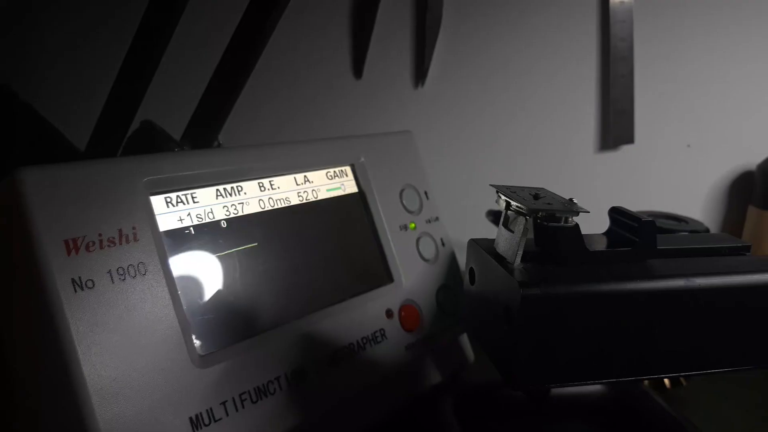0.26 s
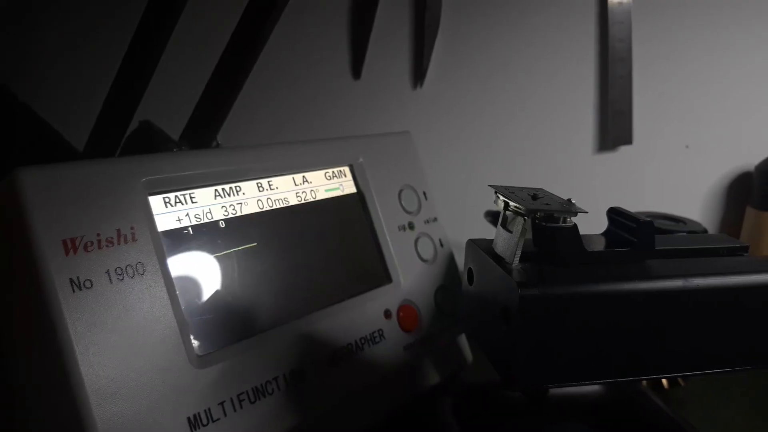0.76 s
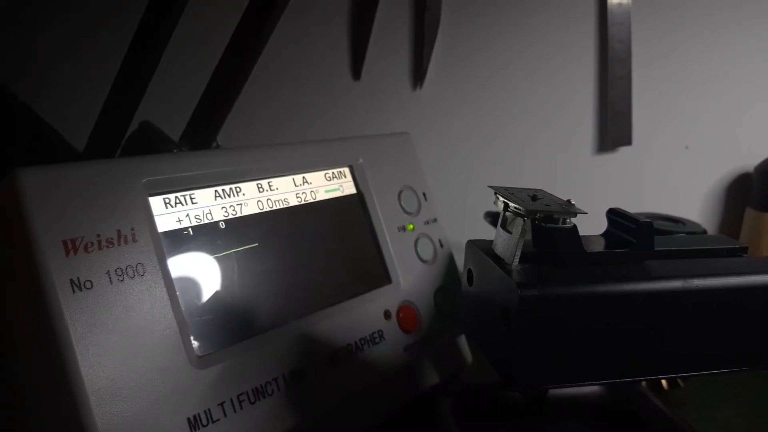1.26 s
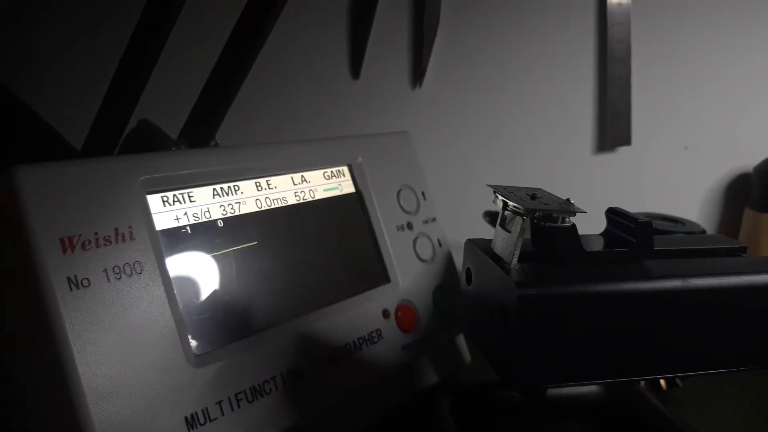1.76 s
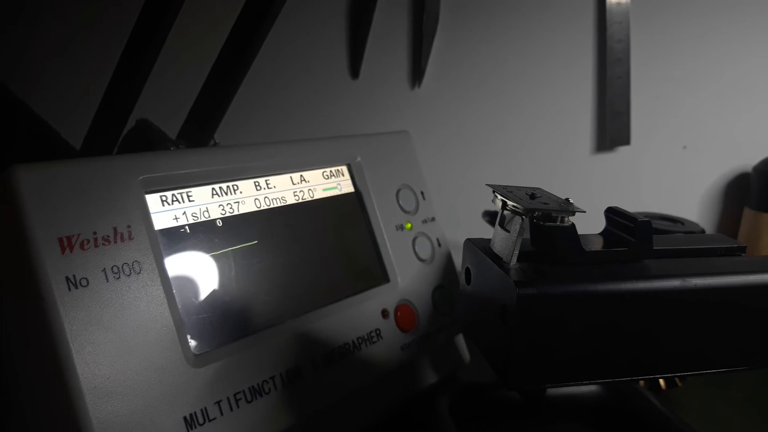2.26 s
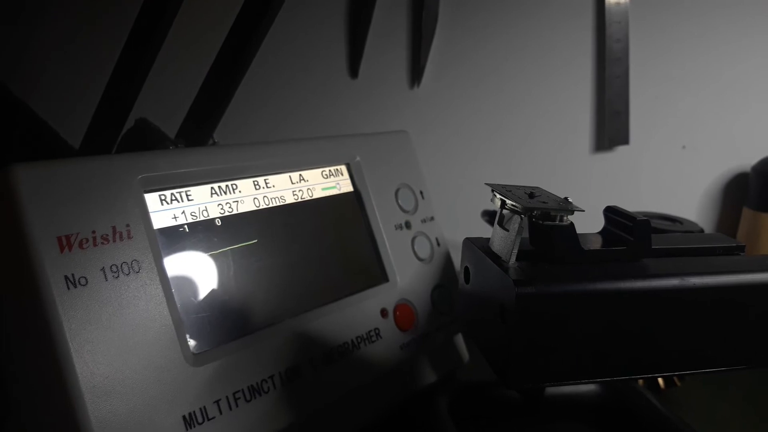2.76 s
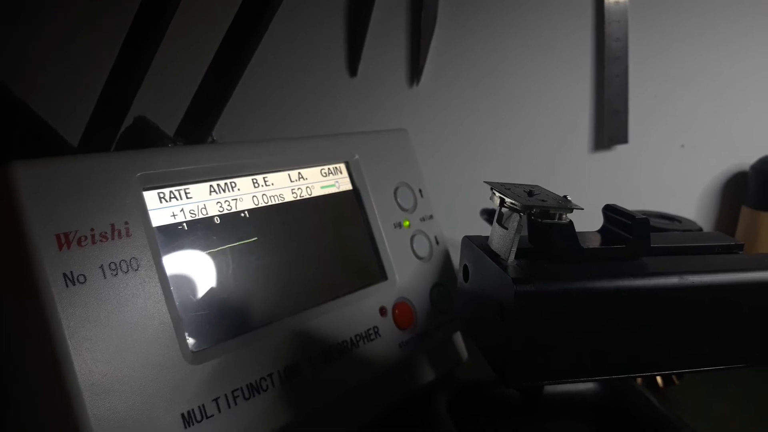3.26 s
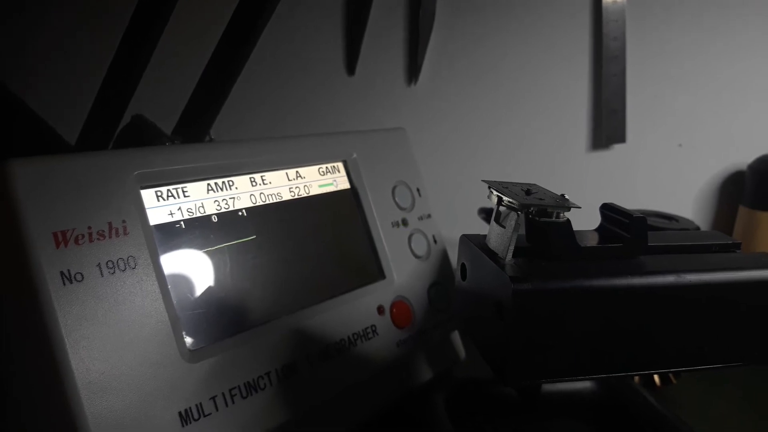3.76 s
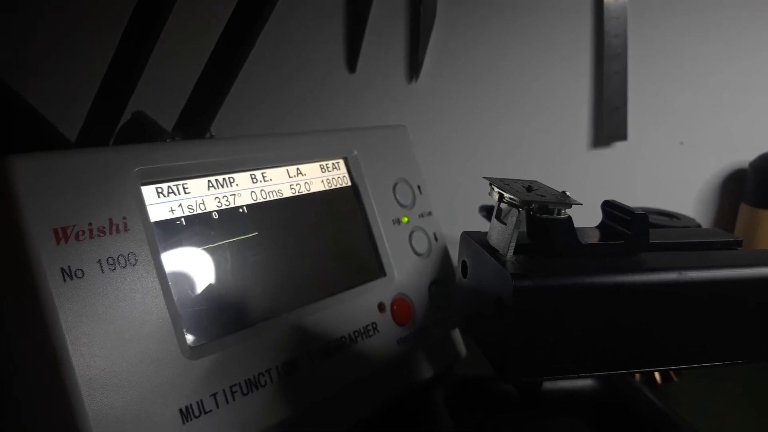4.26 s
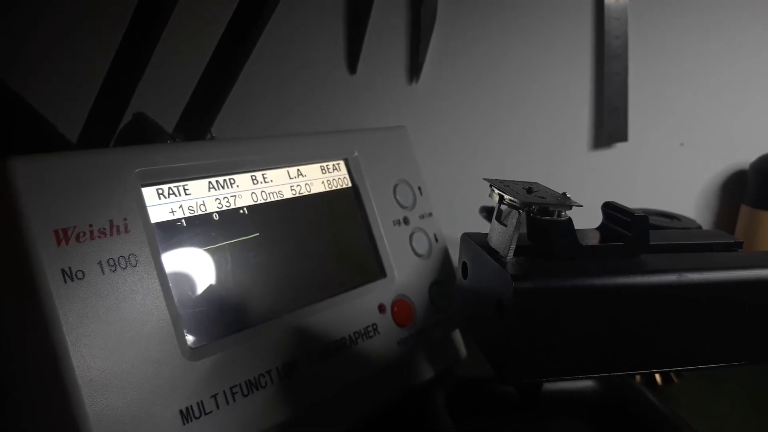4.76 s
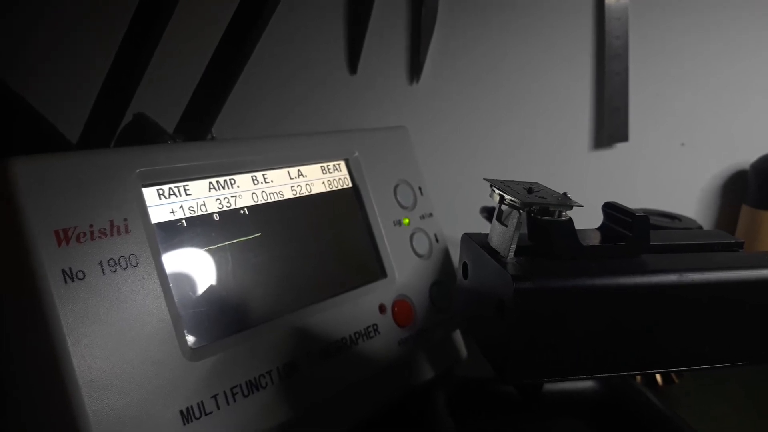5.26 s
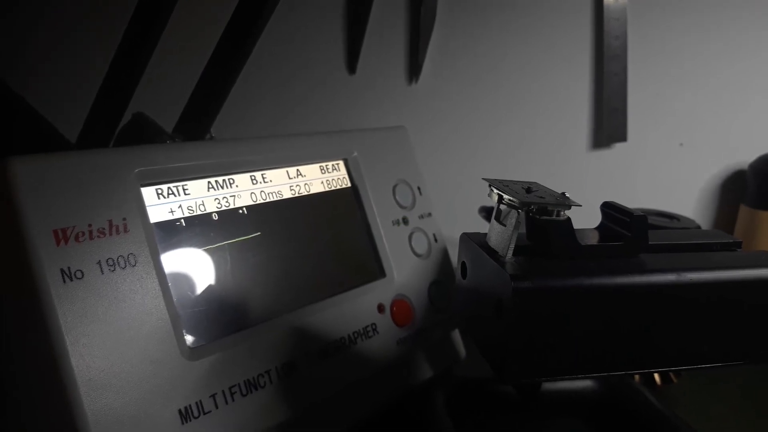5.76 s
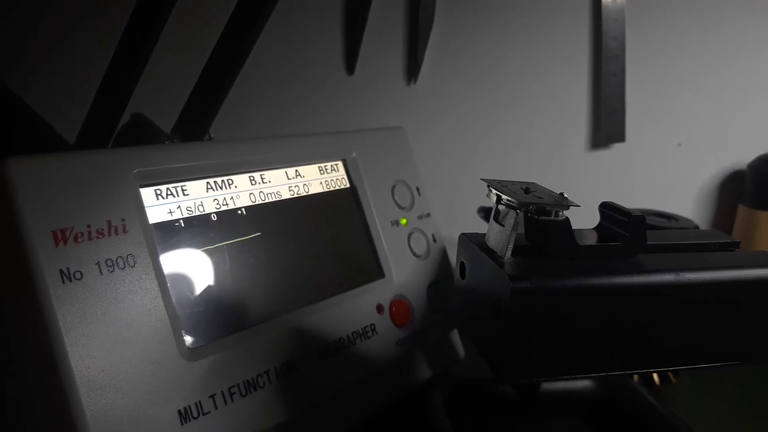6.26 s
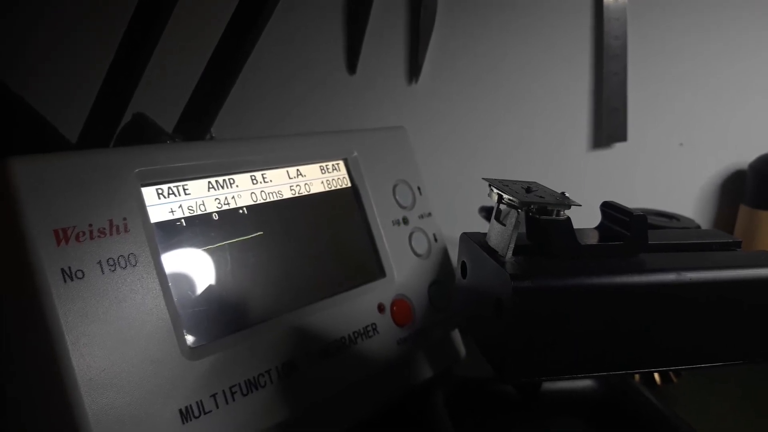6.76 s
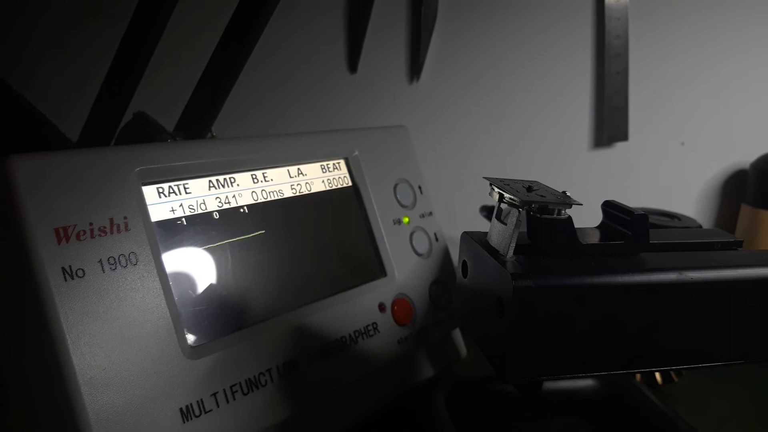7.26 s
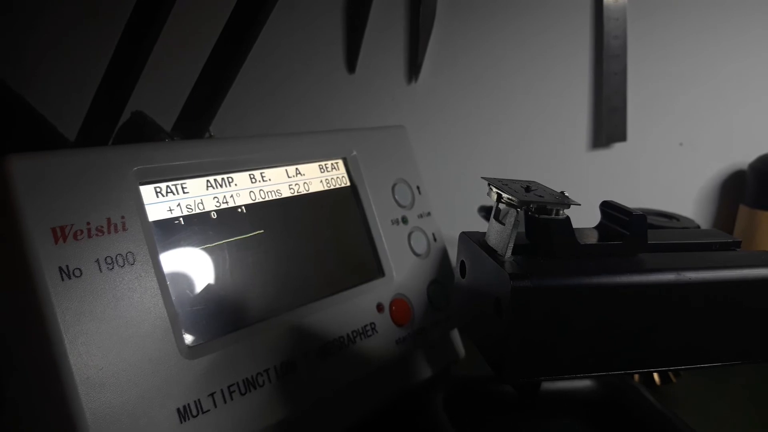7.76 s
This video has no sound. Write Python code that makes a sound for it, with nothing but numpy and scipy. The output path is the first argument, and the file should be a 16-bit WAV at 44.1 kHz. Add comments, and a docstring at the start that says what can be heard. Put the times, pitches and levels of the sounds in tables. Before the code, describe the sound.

A watch timing tester gives loud, even, ringing clicks five times a second over a watch's faint ticking in a quiet workshop.

```python
"""A watch timing tester clicks five times a second in a quiet workshop, loud and always alike.
Each click is a quick run of kicks into a small sounder, and it rings on in the room. Just ahead of it
sits the watch's own escapement, a thin, high tick-tock of steel. Further off, something turning slowly
squeaks three times a turn. A few soft handling knocks and one sharp little click fall over a bed of
low room hum and hiss."""
import sys
import numpy as np
from scipy import signal
from scipy.fft import rfft, irfft
from scipy.io import wavfile

SR = 44100
rng = np.random.default_rng(int(sys.argv[2]) if len(sys.argv) > 2 else 0)


def persist_wave(psi):
    """Save psi, clipped to +-1, as 16-bit WAV."""
    counts = np.round(np.clip(psi, -1, 1) * 32767).astype(np.int16)
    wavfile.write(sys.argv[1], SR, np.atleast_2d(counts).T)


N = 352800

# spectrum of the hum and hiss: f/Hz, relative level/dB
ROOM_TONE = [(20, -105), (45, -96.5), (75, -88.5), (120, -86.5), (180, -92), (240, -100), (500, -101.5),
             (1100, -106), (3000, -107), (7000, -109), (11000, -112), (12500, -108.5), (15800, -109)]
# beats where a tooth lands harder: t/s
HARD_TICKS = [2.9, 3.7, 4.9, 7.7]
# beats where the click is heard a little louder: t/s
LEVEL_LIFTS = [1.1, 2.9, 4.1, 5.7, 7.5]
# kicks into the sounder within one click: delay/ms, relative level/dB
SOUNDER_KICKS = [(0, -2.6), (1.715, -1.5), (2.01, 2.1), (2.472, 5), (3.1, -3), (5.542, -12), (5.672, -5),
                 (7.659, -3)]
# resonances of the sounder in its case: f/Hz, width/Hz, gain/dB
SOUNDER_MODES = [(2048.6, 38.04, 5.5), (2319, 74.3, 2.5), (2513.6, 60, -3), (2822.5, 79, 6),
                 (2869, 64, -4.5), (3729, 61, -11.5), (4492, 78, 1.5), (5058, 160, -8)]
# weak case resonances either side of the sounder's band: f/Hz, width/Hz, gain/dB
CASE_MODES = [(1409, 33.7, -20.5), (7500, 400, -38.5)]
# early reflections off the nearest walls: delay/s, gain/dB
WALL_ECHOES = [(.0098, -28.5), (0.02, -21.5), (0.0293, -26), (.054, -37)]
# colour of the click the sounder throws into the room, all directions summed: f/Hz, relative level/dB
SOUNDER_TAIL = [(1050, -42.5), (1380, -33), (1750, -37), (2030, -11.5), (2350, -8), (2600, -7), (2850, -1),
                (3100, -10.5), (3400, -22.5), (4130, -13.5), (4500, -9.5), (5200, -22.5), (5700, -32.5),
                (8500, -52.5)]
# colour of the room's tail on ticks, squeaks and handling: f/Hz, relative level/dB
ROOM_TAIL = [(100, -4.5), (5000, -7), (16000, -8)]
# squeaks in one turn: t/s, length/s, lower f/Hz, its relative level/dB,
# upper f/Hz, its relative level/dB, its width/Hz
TURN_SQUEAKS = [(0.547, 0.055, 2900, -58, 4890, -66.5, 405), (0.702, 0.07, 2690, -69.5, 6096, -79, 1441),
                (1.037, .035, 3020, -57, 4264, -65, 220)]
# handling knocks: t/s, level/dB, body f/Hz, t60/s, attack/s, contact noise re body/dB, its top f/Hz
SOFT_KNOCKS = [(0.782, -64.5, 145, 0.127, 0.0057, -10, 400), (3.53, -70, 168, 0.117, 0.00147, 6, 380),
               (4.051, -54, 133, 0.054, 0.0042, -2.5, 355.7), (6.656, -55, 68.7, 0.11, .014, -27, 297),
               (7.45, -60, 172, 0.22, .017, -16.5, 300)]
# sharp handling click: t/s, peak level/dB
SHARP_CLICKS = [(7.745, -46)]

FIRST_BEAT_S, BEAT_S = .1017, .199993  # the sounder's first click, and the balance's even pace


def undb(db):
    """Decibels to gain."""
    return 10 ** (np.asarray(db) / 20)


def unit(x):
    """Scale to rms 1."""
    return x / np.sqrt(np.mean(x ** 2))


def seconds(length):
    """Time axis of a short sound."""
    return np.arange(int(length * SR)) / SR


def fade(t, t60):
    """Exponential decay, 60 dB down after t60."""
    return np.exp(-np.log(1000) * t / t60)


def add(out, start, sound):
    """Mix a sound into out at a time in seconds."""
    i = max(int(round(start * SR)), 0)
    part = sound[:max(len(out) - i, 0)]
    out[i:i + len(part)] += part


def band(x, lo_hz, hi_hz, order=2):
    """Causal band-pass."""
    return signal.sosfilt(signal.butter(order, [lo_hz, hi_hz], "band", fs=SR, output="sos"), x)


def ring(x, hz, width_hz):
    """One resonance, gain 1 at its centre."""
    return signal.lfilter(*signal.iirpeak(hz, hz / width_hz, fs=SR), x)


def noise(n, colour):
    """Noise of rms 1, shaped by an EQ curve of f/Hz, level/dB points."""
    hz, db = np.transpose(colour)
    gain = undb(np.interp(np.log(np.fft.rfftfreq(n, 1 / SR) + 1), np.log(hz), db))
    return unit(irfft(rfft(rng.standard_normal(n)) * gain, n))


def beat_times():
    """The time of every sounder click in seconds."""
    return np.arange(FIRST_BEAT_S, N / SR, BEAT_S)


def beat_levels(accents_s, accent_db, scatter_db=0):
    """Level offset of every beat in dB: a lift on the accents, plus any random scatter."""
    beats = beat_times()
    accented = np.abs(beats[:, None] - accents_s).min(axis=1) < BEAT_S / 2
    return scatter_db * rng.standard_normal(len(beats)) + accent_db * accented


def with_echoes(x):
    """A sound plus its early reflections off the walls."""
    out = x.copy()
    for delay, db in WALL_ECHOES:
        add(out, delay, x * undb(db))
    return out


def reverb(x, colour, db, t60, predelay_s, build_s):
    """The workshop's diffuse tail: it blooms after a short gap, then dies away."""
    t = seconds(.45)
    bloom = np.clip((t - predelay_s) / build_s, 0, 1)
    tail = noise(len(t), colour) * fade(t, t60) * bloom
    tail *= undb(db) / np.linalg.norm(tail)
    return irfft(rfft(x) * rfft(tail, N), N)  # wraps round, so the room already rings at the start


def room_tone(level_db=-74.5, waver_db=1.2):
    """The bed: the building's low hum, gently wavering, under a steady hiss."""
    air = noise(N, ROOM_TONE) * undb(level_db)
    hum = signal.sosfiltfilt(signal.butter(2, 250, fs=SR, output="sos"), air)
    waver = np.interp(np.arange(N), np.linspace(0, N, 64), rng.standard_normal(64))
    return air + hum * (undb(waver_db * waver) - 1)


def escapement(tick_db=-67.5, tock_db=-70, unlock_db=-11, plate_db=-5, lead_s=.0203, unlock_s=.005):
    """Two pallets take turns: a faint unlocking, then a steel tooth lands and the plate rings along."""
    envelope, t = np.zeros(N), seconds(.04)
    strike = fade(t, t60=.029) * np.minimum(t / .0012, 1)
    landings = beat_times() - lead_s  # just ahead of the tester's answer
    levels = beat_levels(HARD_TICKS, accent_db=4.5) + np.resize([tick_db, tock_db], len(landings))
    for start, db in zip(landings, levels):
        add(envelope, start - unlock_s, strike * undb(db + unlock_db))
        add(envelope, start, strike * undb(db))
    steel = unit(band(rng.standard_normal(N), lo_hz=11700, hi_hz=14700, order=4))
    plate = unit(band(rng.standard_normal(N), lo_hz=2200, hi_hz=4600, order=3))
    return envelope * (steel + undb(plate_db) * plate)


def sounder(drive_db=6.0, edge_db=-60):
    """The lead click: each beat fires the same kicks into the sounder's resonances; the room answers."""
    size = 4096
    hz = np.fft.rfftfreq(size, 1 / SR)
    # delays as phase ramps, so the kicks can land between samples
    kick_spectrum = sum(undb(db) * np.exp(-2j * np.pi * hz * ms / 1000) for ms, db in SOUNDER_KICKS)
    kicks = irfft(kick_spectrum)[:size // 2]
    trigger = np.zeros(N)
    for start, db in zip(beat_times(), beat_levels(LEVEL_LIFTS, accent_db=1.2, scatter_db=.15)):
        add(trigger, start, undb([db]))
    drive = signal.fftconvolve(trigger, kicks * undb(drive_db))[:N]
    body = sum(undb(db) * ring(drive, f, width) for f, width, db in SOUNDER_MODES)
    body = band(body, lo_hz=2058, hi_hz=5026, order=8)  # a tiny diaphragm radiates only a narrow band
    case = sum(undb(db) * ring(drive, f, width) for f, width, db in CASE_MODES)
    case = band(case, lo_hz=1007, hi_hz=7750, order=12)
    # each kick's sharp edge leaks through as a trace of top end
    edge = undb(edge_db) * band(drive, lo_hz=11500, hi_hz=15600)
    tail = reverb(trigger, SOUNDER_TAIL, db=-13.5, t60=.35, predelay_s=.0017, build_s=.012)
    return with_echoes(body + case + edge) + tail


def squeaks(turn_s=1.149, lower_width_hz=600):
    """A dry rub comes round at the same three spots every turn; each sets two resonances singing."""
    out = np.zeros(N)
    for start, length, lower_hz, lower_db, upper_hz, upper_db, upper_width_hz in TURN_SQUEAKS:
        pressure = np.zeros(N)
        for turn in np.arange(0, N / SR, turn_s):
            add(pressure, start + turn, signal.windows.tukey(int(length * SR), .5))
        for hz, width, db in (lower_hz, lower_width_hz, lower_db), (upper_hz, upper_width_hz, upper_db):
            friction = rng.standard_normal(N)
            squeal = unit(ring(ring(friction, hz, width), hz, width))
            out += pressure * undb(db) * squeal
    return out


def handling(desk_at_s=4.053, desk_db=-60, desk_hz=850):
    """Soft knocks, each a low thump with a scuff of contact noise, and one sharp little click."""
    out, t = np.zeros(N), seconds(.3)
    for start, db, hz, t60, attack, contact_db, top_hz in SOFT_KNOCKS:
        thump = np.sin(2 * np.pi * hz * t) * fade(t, t60) * np.minimum(t / attack, 1)
        contact = unit(band(rng.standard_normal(len(t)), lo_hz=70, hi_hz=top_hz)) * fade(t, t60=.037)
        add(out, start, undb(db) * (thump + undb(contact_db) * contact))
    # the desk top rings briefly under the firmest knock
    add(out, desk_at_s, undb(desk_db) * np.sin(2 * np.pi * desk_hz * t) * fade(t, t60=.04))
    for start, db in SHARP_CLICKS:
        burst = rng.standard_normal(len(t)) * fade(t, t60=.003)
        click = band(burst, lo_hz=1800, hi_hz=6300, order=4)
        add(out, start, undb(db) * click / np.abs(click).max())
    return out


def scene():
    """The mix: tester, watch and hands up close and mostly dry; the squeaks set back, half room."""
    near = escapement() + handling()
    far = squeaks()
    send = undb(-12) * near + far
    room = reverb(send, ROOM_TAIL, db=-.5, t60=.21, predelay_s=.0066, build_s=.0092)
    return (sounder() + near + undb(-1) * far + room + room_tone())[None]


def record(dry, top_hz=15800):
    """A steep high cut shaves off the very top."""
    return signal.sosfilt(signal.ellip(10, .1, 70, top_hz, fs=SR, output="sos"), dry)


dry = scene()
out = record(dry)
persist_wave(out)
```